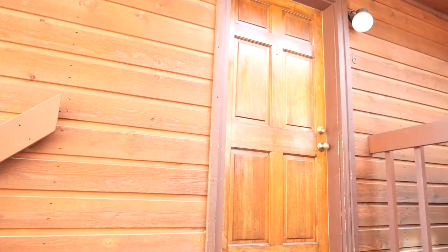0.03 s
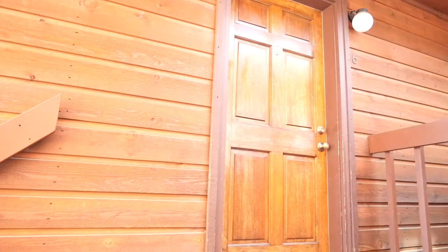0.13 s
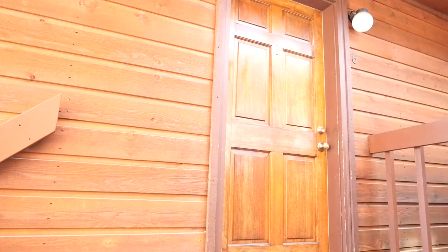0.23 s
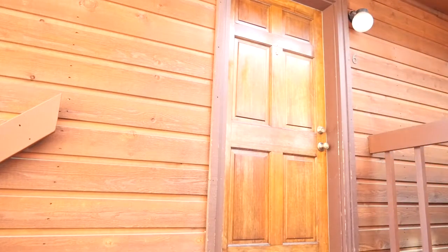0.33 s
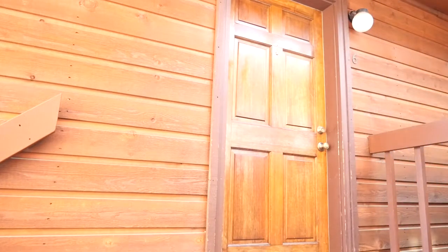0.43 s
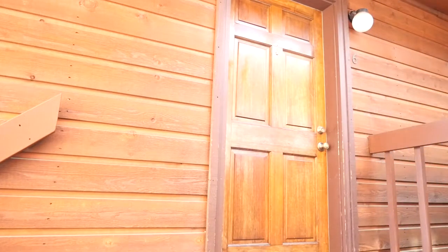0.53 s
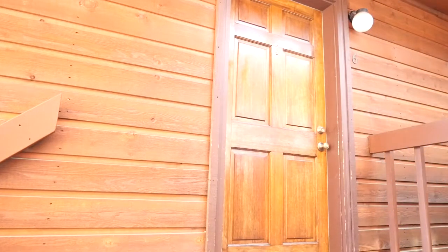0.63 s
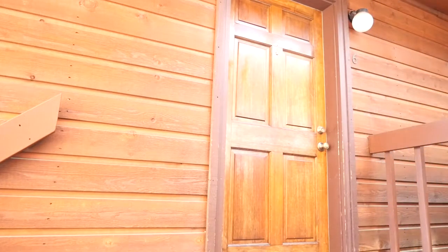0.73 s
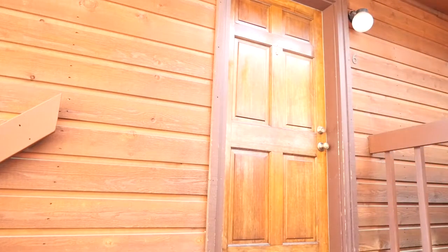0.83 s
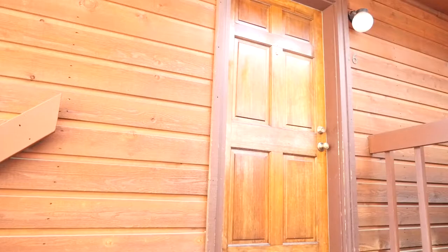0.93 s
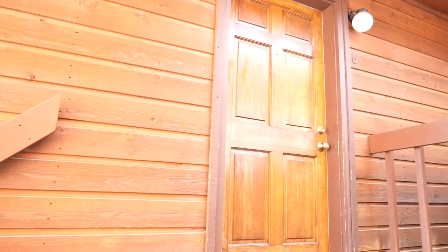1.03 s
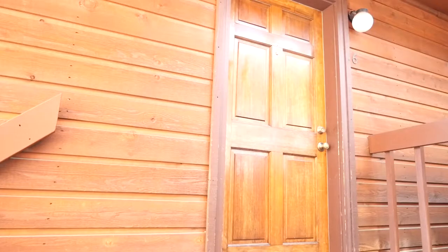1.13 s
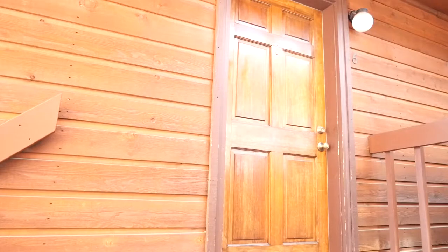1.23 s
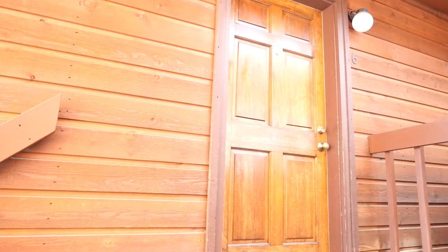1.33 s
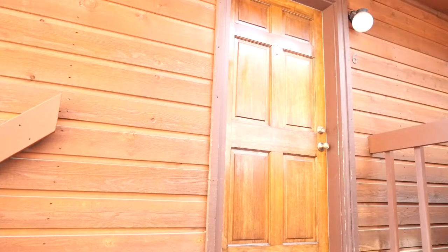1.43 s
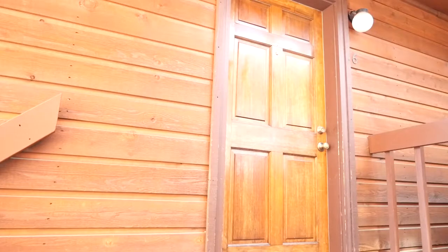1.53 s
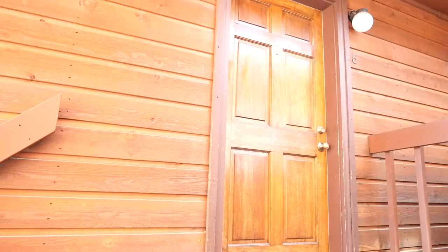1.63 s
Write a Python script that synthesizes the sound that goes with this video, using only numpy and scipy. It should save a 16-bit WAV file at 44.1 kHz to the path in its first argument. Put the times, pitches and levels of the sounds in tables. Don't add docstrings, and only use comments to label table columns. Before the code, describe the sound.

Close on an outdoor porch, faint metal clicks lead into one loud woody door blow with short echo, then a softer rattle and thud, a brief board groan, quiet scuffs and taps over low air hum.

```python
import sys
import numpy as np
from scipy import signal
from scipy.io import wavfile
from scipy.ndimage import uniform_filter1d

SR = 44100
rng = np.random.default_rng(int(sys.argv[2]) if len(sys.argv) > 2 else 0)


def ratio(d):
    e = np.asarray(d, float) / 20
    return 10 ** e


def file_out(sig):
    cols = np.atleast_2d(sig).T
    lim = np.clip(cols, -1, 1)
    pcm = np.round(lim * 32767).astype(np.int16)
    wavfile.write(sys.argv[1], SR, pcm)


N = 74970

# (time [s], level [dB], push length [ms])
BLOWS = [
    (.2117, -5.5, 0.43),
    (.2131, -8.5, 0.26),
    (0.2146, -10, 0.41),
    (0.2158, -11, 0.73),
    (.2176, -11, 0.78),
    (0.2271, -16.5, 0.8),
    (0.2415, -15, 0.79),
    (.2495, -20, .8),
    (0.2548, -19.5, 0.7),
]
# (frequency [Hz], level [dB], time to fall 60 dB [s])
DOOR_MODES = [(332, -14, 0.4), (398.6, -3, 0.52), (428.5, -10.5, 0.38), (526.4, -6, 0.3), (616.4, 3, 0.15),
              (769, -3, 0.55), (793, -1, .6), (830, -5, 0.42), (946, -10.5, 0.4), (912, -8, 0.46),
              (1024, -4.5, 0.23), (1246, -4.5, .35), (1547, 0, 0.24), (2080, -5, 0.22)]
# (frequency [Hz], width [Hz], level [dB])
PANELS = [(239, 35, -9), (365, 45, 2.5), (590, 113, 2.5), (865, 280, 2), (1140, 230, -1.5),
          (1580, 500, -7.5), (2200, 170, -3)]
# (time [s], level [dB], frequency [Hz], time to fall 60 dB [s])
TAPS = [(0.2113, -8.5, 1350, .02), (.2122, -14, 2200, .03), (0.2134, -10, 1137, .04),
        (0.2145, -12, 1845, 0.026), (.213, -13.5, 2560, .03), (.2165, -16, 2200, 0.028),
        (.2175, -10.5, 754, .04), (.2412, -9.5, 800, 0.034), (0.1603, -29.5, 2890, 0.028),
        (0.4439, -24, 2560, .03), (0.4368, -26, 2290, 0.027), (1.518, -40, 1310, .04),
        (1.5734, -33, 960, .04), (1.5813, -37, 1010, 0.044), (1.5811, -39.5, 1890, .03),
        (1.606, -35.5, 950, .06), (1.6539, -41, 1960, .03), (1.6675, -41.5, 2730, 0.056),
        (1.68, -41.5, 2050, .05)]
# (time [s], level [dB], centre [Hz], width [Hz], time to fall 60 dB [s])
CRACKS = [
    (.0915, -27, 8000, 12000, 0.0099),
    (0.2144, -8, 9500, 4500, 0.018),
    (0.2198, -11, 3350, 1000, 0.04),
    (0.2212, -6, 7400, 2500, .018),
    (0.2238, -9, 5550, 900, 0.025),
    (.2205, -17, 4900, 1500, .04),
    (.2108, -25, 3000, 5000, 0.011),
    (0.2116, -13, 1700, 2000, 0.045),
]
# (frequency [Hz], width [Hz], level [dB], time to fall 60 dB [s])
SHUDDER_MODES = [(400, 180, -25, 0.6), (800, 200, -19, 0.6), (1600, 2100, -23, 0.58),
                 (3130, 1400, -21.5, 0.43), (5005, 5400, -27, 0.52), (8000, 9100, -27, 0.56),
                 (12900, 5400, -34, 0.447)]
# (frequency [Hz], width [Hz], level [dB])
METAL = [(2712, 790, -3), (3034, 370, -13), (3447, 760, -5), (4760, 4500, -7), (5820, 840, -11),
         (7060, 2800, -9), (11400, 6500, -15), (1877, 1400, -8.5)]
# (peak [s], rise [s], time to fall 60 dB [s], level [dB], brightness [dB per octave])
SHAKES = [(.0, .01, 0.67, -33.5, -5.5), (.03, 0.0099, 1, -44, 5), (0.093, 0.00069, 0.22, -31, 4),
          (0.102, 0.0026, 0.29, -33.5, 6), (.162, 0.016, 0.28, -35.5, 1), (.178, 0.0075, 0.086, -42, -4),
          (0.442, 0.029, 0.29, -27, 4), (0.461, 0.022, 0.29, -27, 1), (.49, 0.016, 0.28, -30.5, 2),
          (0.52, 0.024, 0.4, -33.5, 2), (.555, 0.027, 0.26, -36.5, 2.5), (0.584, 0.021, 0.28, -38, 1),
          (.63, 0.025, 0.25, -42.5, -0.5)]
# (peak [s], rise [s], time to fall 60 dB [s], level [dB], frequency [Hz])
RINGS = [(0.031, 0.018, 0.18, -39.5, 3100), (0.091, 0.0079, 0.19, -40.5, 1430),
         (.176, .015, 0.073, -38, 3440), (0.435, 0.008, 0.4, -33, 5900), (0.456, 0.017, 0.13, -33.5, 5900),
         (0.475, .015, 0.24, -33.5, 3480), (0.514, 0.021, .3, -38, 3450), (0.569, 0.022, 0.33, -38.5, 3480),
         (0.45, 0.016, .4, -37, 2700), (0.582, 0.026, .3, -44, 2750), (0.645, 0.026, 0.2, -50.5, 6000),
         (0.022, 0.0051, .1, -41.5, 900), (.46, 0.007, 0.2, -28.5, 3070), (0.52, 0.016, 0.25, -41, 6020),
         (0.584, 0.023, 0.38, -43.5, 5950), (0.454, 0.027, 0.17, -28, 933),
         (1.675, 0.0089, 0.16, -50.5, 2670), (1.535, 0.011, 0.23, -49.5, 3570),
         (1.7, 0.016, 0.34, -41.5, 390), (0.41, 0.013, .2, -32, 990), (1.24, .015, 0.22, -42, 190)]
# (peak [s], rise [s], time to fall 60 dB [s], level [dB], frequency [Hz])
BOARDS = [(0.0046, .01, 0.32, -35.5, 340), (0.029, 0.039, 0.18, -41, 890), (.435, 0.019, 0.41, -27, 850),
          (0.24, .02, 0.42, -23.5, 860), (.45, 0.036, 0.2, -32.5, 380), (0.439, 0.026, 0.44, -31, 1340),
          (.53, 0.0094, 0.55, -35.5, 305), (.57, 0.031, 0.32, -32, 830), (0.37, .02, 0.24, -41.5, 330),
          (1.034, 0.012, 0.38, -37, 850), (1.05, 0.03, 0.36, -40, 350), (0.87, .01, 0.072, -41.5, 710),
          (1.203, 0.017, .2, -37.5, 220), (1.228, 0.013, 0.2, -39, 260), (1.245, .01, .15, -41, 350),
          (1.61, 0.052, 0.23, -42, 410), (1.54, 0.021, 0.35, -38, 230), (1.53, 0.012, 0.74, -41, 885),
          (1.8, 0.016, 0.2, -45.5, 950), (1.58, .02, .25, -39.5, 307), (0.73, .03, 0.66, -49, 87),
          (1, 0.043, 0.37, -46.5, 172), (.325, 0.063, 0.24, -43.5, 140)]
# (peak [s], rise [s], time to fall 60 dB [s], level [dB])
GROANS = [
    (1.055, 0.018, .2, -31),
    (1.077, 0.009, 0.13, -27),
]
# (peak [s], rise [s], time to fall 60 dB [s], level [dB], centre frequency [Hz])
SCUFFS = [
    (1.06, 0.031, 0.75, -53.5, 1850),
    (1.2, 0.033, 0.21, -56, 5360),
    (1.21, 0.043, 0.37, -53.5, 2390),
    (1.495, 0.012, 0.41, -58, 9000),
    (1.524, 0.032, 0.31, -49, 3500),
    (1.53, 0.029, 0.52, -47, 1600),
    (1.59, .03, 0.41, -47.5, 2200),
    (1.69, 0.037, 0.19, -48.5, 2500),
    (1.69, 0.022, .3, -58.5, 7040),
]
# (frequency [Hz], time to fall 60 dB [s], level [dB])
PORCH = [(197, 0.301, -2.5), (373, 0.7, 3), (864, 0.99, -6.5), (1600, 0.56, -1.5), (3180, 0.68, 3.5),
         (6860, 0.15, -6), (12000, 0.6, 2)]
# (frequency [Hz], level [dB per Hz])
AIR = [(12, -40), (20, 16), (88, -12.5), (126, -5), (333, -8), (405, -7.5), (747, -12.5), (934, -18),
       (15600, -65)]
# (frequency [Hz], width [Hz], level [dB])
HUM = [(141.5, 44, -47), (884, 121, -46.5)]
# (peak [s], rise [s], time to fall 60 dB [s], level [dB], frequency [Hz])
BREEZE = [
    (0.371, 0.078, 0.68, -43.5, 27),
    (1.06, 0.015, 0.66, -40.5, 28),
    (1.14, .04, 0.57, -49, 70.7),
    (1.25, 0.052, 0.68, -44.5, 60.4),
    (1.67, 0.031, .5, -47, 88),
]
# (start [s], length [s], frequency [Hz])
GAPS = [(.255, .07, 14750), (.25, .06, 12100), (.26, .05, 13300), (.335, .08, 12800), (.29, .03, 8800),
        (.37, .05, 8750), (.5, .08, 14750), (.515, .04, 12000), (.54, .14, 8750), (.54, .1, 9950),
        (.54, .09, 13400), (.61, .06, 9500), (.62, .05, 14100), (.62, .04, 12300), (.66, .06, 12800),
        (.67, .05, 11200), (.02, .04, 11500), (.03, .04, 13800)]

LONGEST_RISE_S = 0.03
AIR_FLICKER_DB = 0.6


def unit(x):
    return x / np.sqrt(np.mean(x ** 2))


def band(x, hz, width):
    return signal.lfilter(*signal.iirpeak(min(hz, SR / 2.2), hz / width, fs=SR), x)


def band_twice(x, hz, width):
    return band(band(x, hz, width), hz, width)


def steep(hz, width):
    return unit(band_twice(rng.standard_normal(N), hz, width))


def fade(s, t60):
    t = np.arange(N) / SR - s
    return (t >= 0) * np.exp(-np.log(1000) * np.maximum(t, 0) / t60)


def swell(s, rise, t60):
    t = np.arange(N) / SR - s
    return np.where(t < 0, np.exp(-(t / rise) ** 2), fade(s, t60))


def walk(rate):
    hold = int(SR / rate)
    levels = np.repeat(rng.standard_normal(N // hold + 1), hold)
    smooth = uniform_filter1d(uniform_filter1d(levels, hold), hold)
    return 1.48 * smooth[:N]


def door():
    modes_db, panels_db, ring_share, low_cut_hz = -29.5, 12, 0.66, 211
    t = np.arange(N) / SR
    force = np.zeros(N)
    for s, db, ms in BLOWS:
        progress = np.clip((t - s) * 1000 / ms, 0, 1)
        force -= ratio(db) * np.sin(np.pi * progress) ** 2
    out = np.zeros(N)
    for hz, db, t60 in DOOR_MODES:
        ringing = fade(0, t60 * ring_share) * np.sin(2 * np.pi * hz * t)
        out += ratio(db + modes_db) * signal.fftconvolve(force, ringing)[:N]
    for hz, width, db in PANELS:
        out += ratio(panels_db + db) * band(force, hz, width)
    return signal.sosfilt(signal.butter(3, low_cut_hz, "high", fs=SR, output="sos"), out)


def taps():
    t = np.arange(N) / SR
    return sum(-ratio(db) * fade(s, t60) * np.sin(2 * np.pi * hz * (t - s)) for s, db, hz, t60 in TAPS)


def latch():
    return sum(ratio(db) * fade(s, t60) * steep(hz, width) for s, db, hz, width, t60 in CRACKS)


def shudder():
    peak_s = 0.2212
    return sum(ratio(db) * swell(peak_s, 0.0032, t60) * steep(hz, width)
               for hz, width, db, t60 in SHUDDER_MODES)


def hardware():
    clicks_per_s, click_spread_db, flicker_db = 6000, 2, 1.5
    out = np.zeros(N)
    for hz, width, db in METAL:
        hits = rng.random(N) < clicks_per_s / SR
        strength = ratio(click_spread_db * rng.exponential(size=N))
        clicks = hits * rng.standard_normal(N) * strength
        power = np.zeros(N)
        for s, rise, t60, shake_db, tilt in SHAKES:
            level = ratio(shake_db + tilt * np.log2(hz / 3000))
            power += (level * swell(s, rise, t60)) ** 2
        flicker = ratio(db - 4.5 + flicker_db * walk(39.4))
        out += flicker * np.sqrt(power) * unit(band_twice(clicks, hz, width))
    return out


def rings():
    sharpness = 14
    return sum(ratio(db) * swell(s, rise, t60) * steep(hz, hz / sharpness) for s, rise, t60, db, hz in RINGS)


def boards():
    sharpness = 1.68
    return sum(ratio(db) * swell(s, min(rise, LONGEST_RISE_S), t60) * steep(hz, hz / sharpness)
               for s, rise, t60, db, hz in BOARDS)


def groans():
    tone = np.sin(2 * np.pi * 452 * np.arange(N) / SR)
    return sum(ratio(db) * swell(s, rise, t60) * tone for s, rise, t60, db in GROANS)


def scuffs():
    return sum(ratio(db) * swell(s, min(rise, LONGEST_RISE_S), t60) * steep(hz, hz * 0.95)
               for s, rise, t60, db, hz in SCUFFS)


def porch(x):
    wet_db, predelay_s = -8.5, 0.0068
    tail = np.zeros(N)
    for hz, t60, db in PORCH:
        noise = band_twice(rng.standard_normal(N), hz, hz)
        tail += ratio(db) * fade(predelay_s, t60) * noise / np.sqrt(t60 * SR / 14)
    return x + ratio(wet_db) * signal.fftconvolve(x, tail)[:N]


def air():
    hz_at, db_at = np.array(AIR).T
    out = np.zeros(N)
    for hz in 24 * 2 ** np.arange(0, 9.6, 0.5):
        db = np.interp(np.log(hz), np.log(hz_at), db_at) + AIR_FLICKER_DB * walk(9.25)
        out += ratio(db) * band_twice(rng.standard_normal(N), hz, hz / 2)
    return ratio(-40) * unit(out)


def hum():
    return sum(ratio(db + AIR_FLICKER_DB * walk(12.6)) * unit(band(rng.standard_normal(N), hz, width))
               for hz, width, db in HUM)


def breeze():
    return sum(ratio(db) * swell(s, rise, t60) * steep(hz, hz) for s, rise, t60, db, hz in BREEZE)


def treble_gaps(x):
    width_hz, gap_db = 330, -28
    hz, t, spectrum = signal.stft(x, SR, nperseg=512)
    gain = np.ones(spectrum.shape[1:])
    for s, length, centre in GAPS:
        in_band = np.abs(hz - centre) < width_hz / 2
        in_time = (t > s) & (t < s + length)
        gain[np.ix_(in_band, in_time)] = ratio(gap_db)
    return signal.istft(spectrum * gain, SR, nperseg=512)[1][:, :N]


def scene():
    struck = porch(door() + taps() + latch())
    metal = hardware() + rings()
    feet = boards() + groans() + scuffs()
    low_cut = signal.butter(2, 50.3, "high", fs=SR, output="sos")
    outdoors = signal.sosfilt(low_cut, air() + hum())
    return (struck + shudder() + metal + feet + outdoors + breeze())[None]


def band_limit(x):
    return signal.sosfilt(signal.butter(12, 15710, fs=SR, output="sos"), x)


def record(dry):
    driven = 1.16 * dry
    x = driven / (1 + np.abs(driven) ** 6) ** (1 / 6)
    x = signal.sosfilt(signal.ellip(8, 0.2, 70, 15350, fs=SR, output="sos"), x)
    mix = np.clip(treble_gaps(x), -1, 1)
    return band_limit(mix)


dry = scene()
out = record(dry)
file_out(out)
```